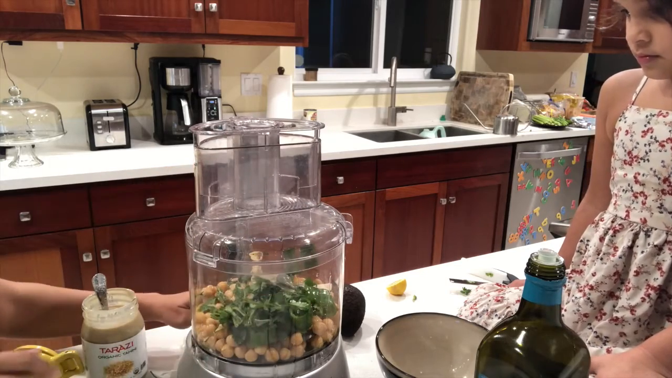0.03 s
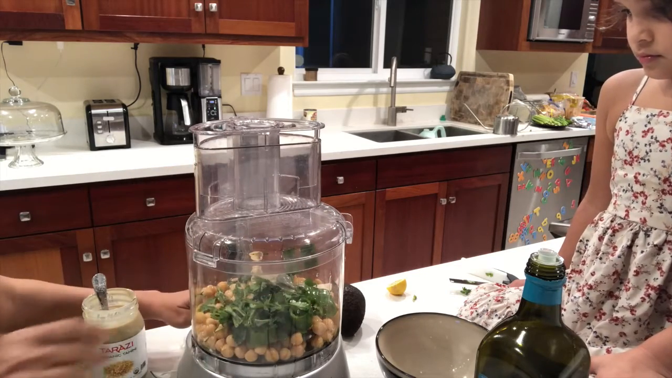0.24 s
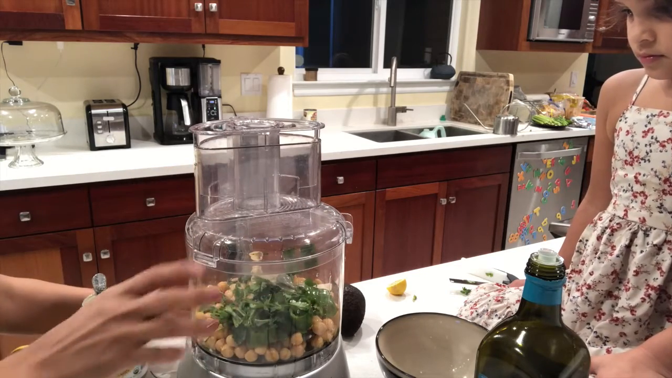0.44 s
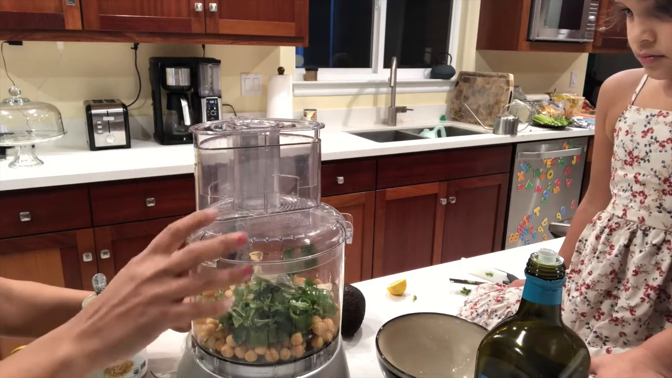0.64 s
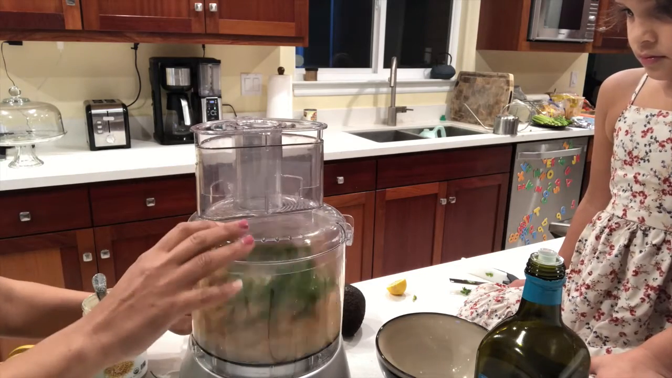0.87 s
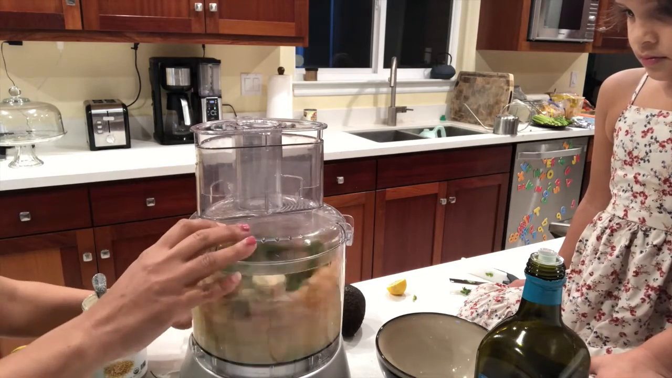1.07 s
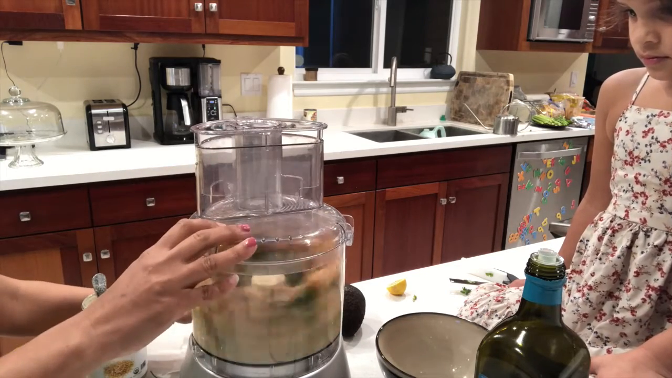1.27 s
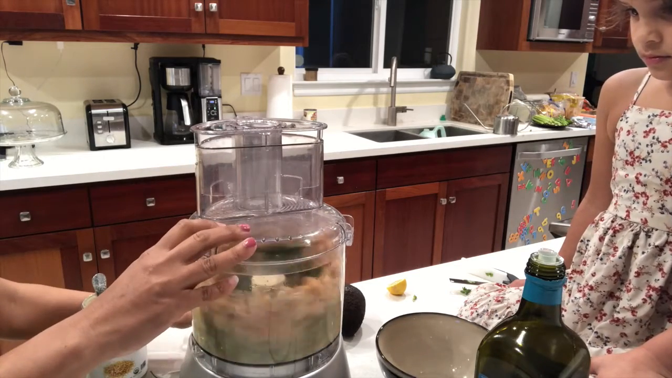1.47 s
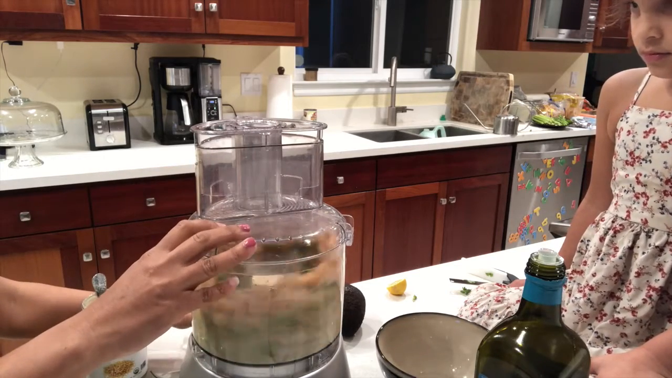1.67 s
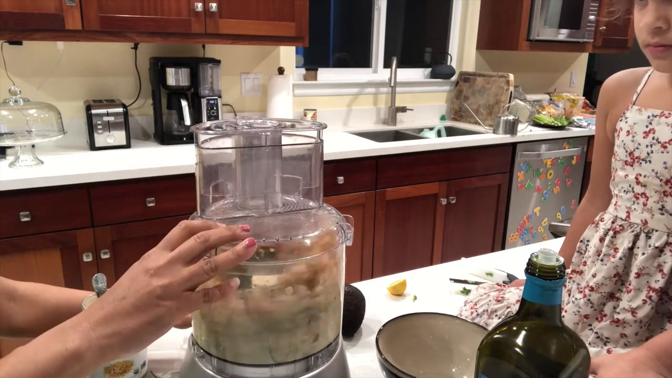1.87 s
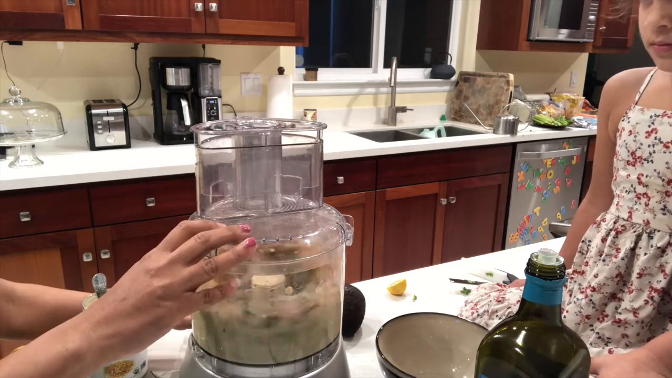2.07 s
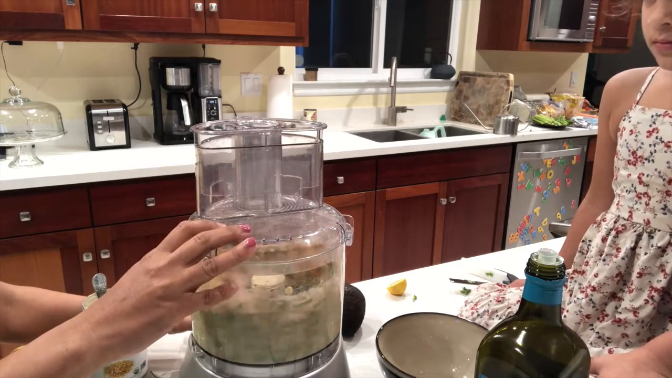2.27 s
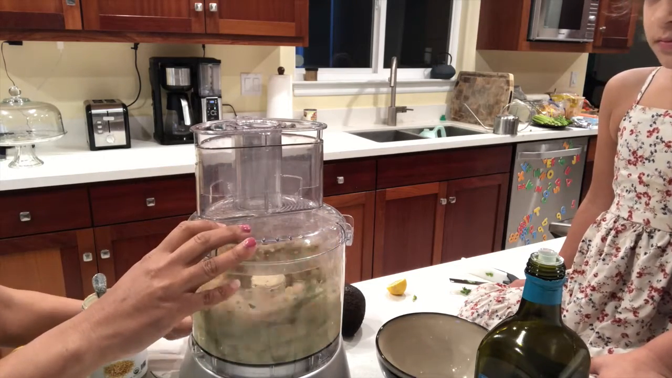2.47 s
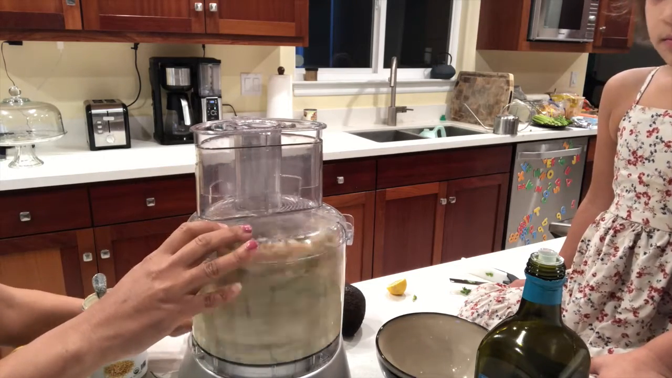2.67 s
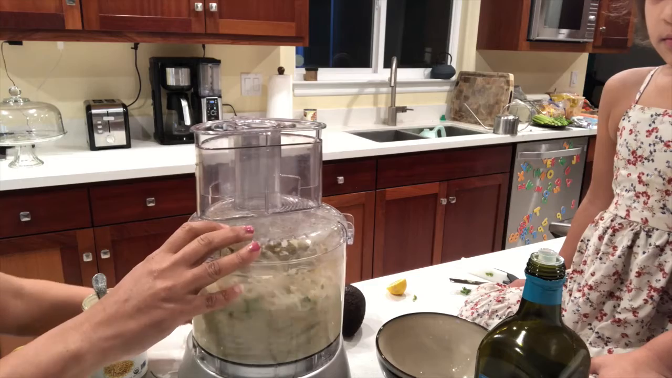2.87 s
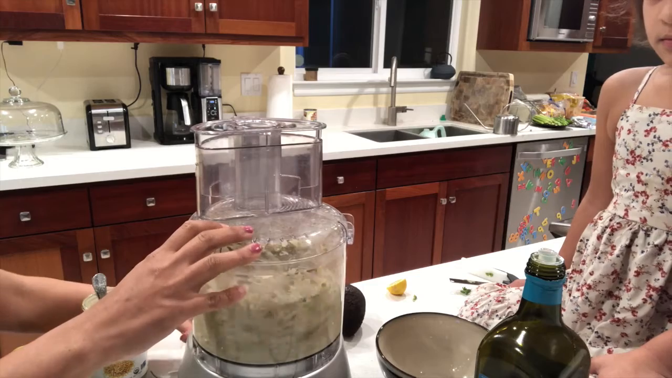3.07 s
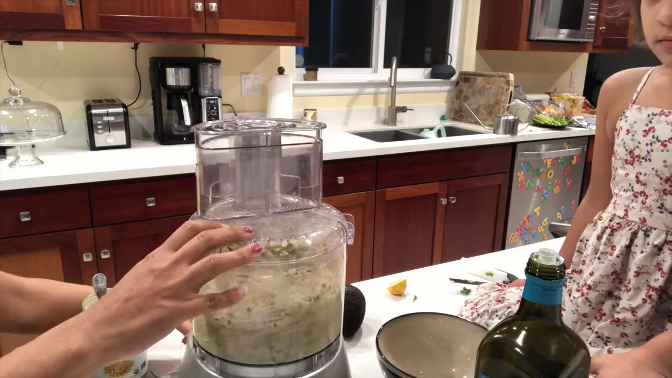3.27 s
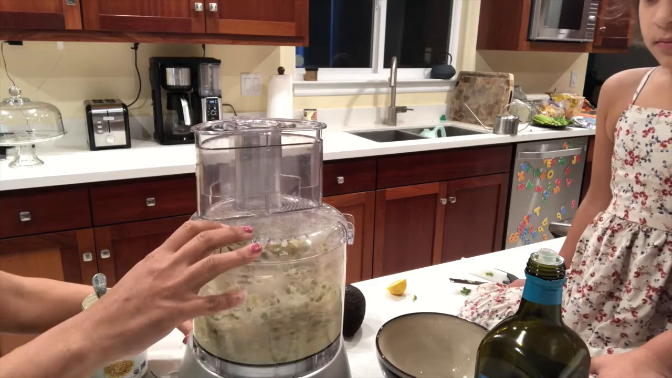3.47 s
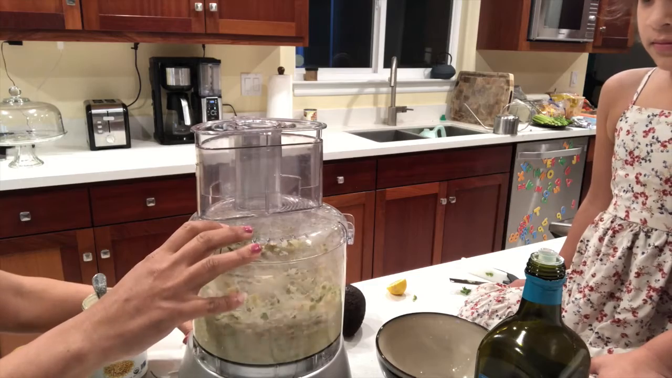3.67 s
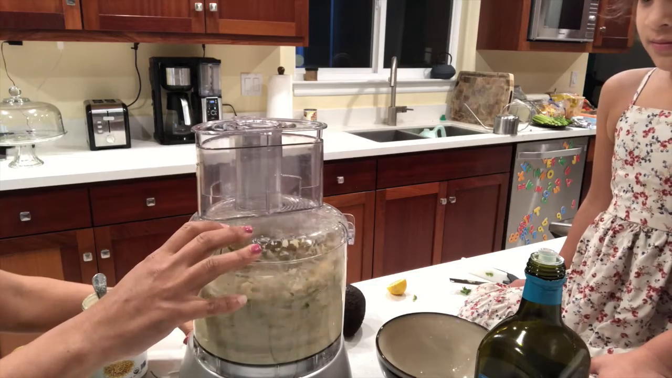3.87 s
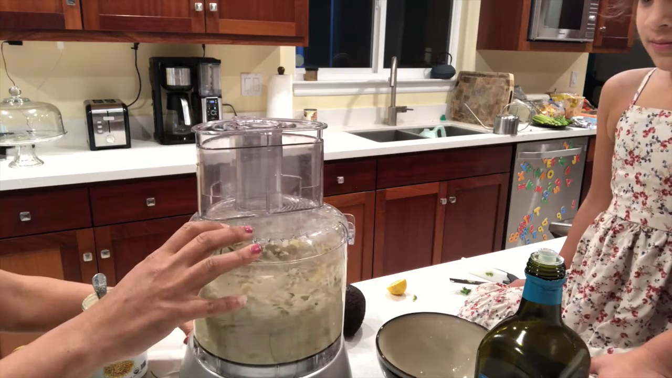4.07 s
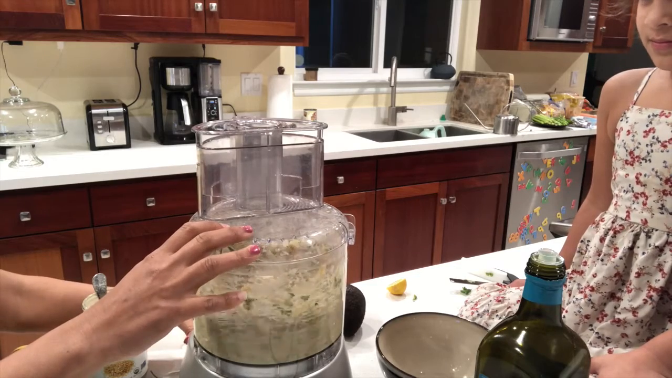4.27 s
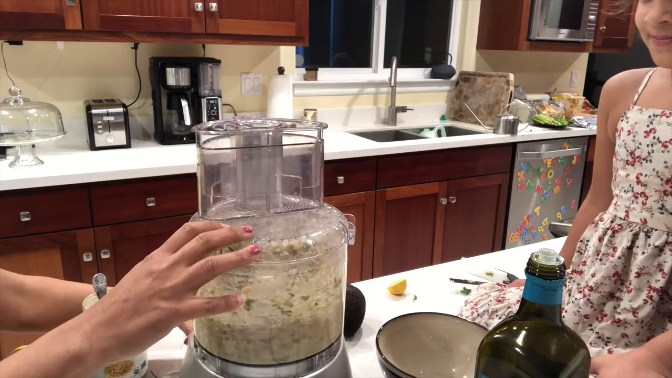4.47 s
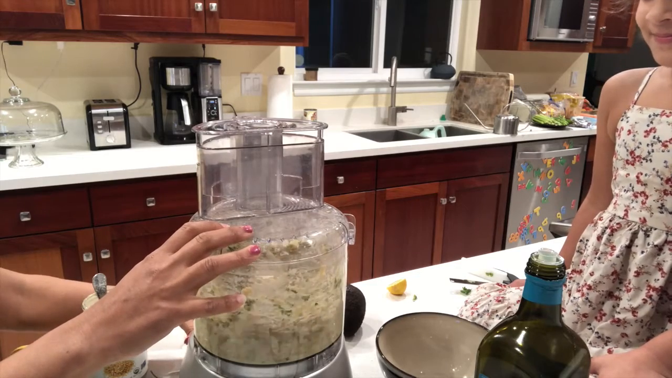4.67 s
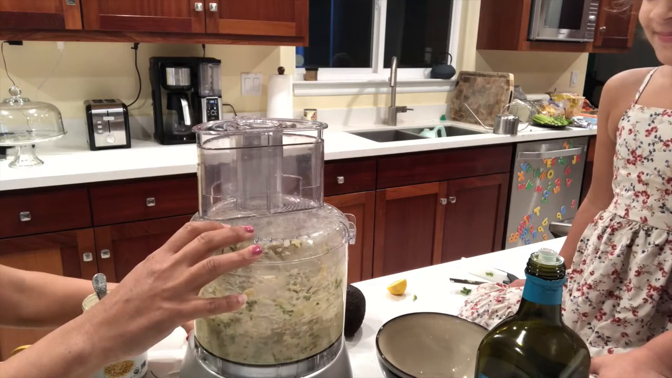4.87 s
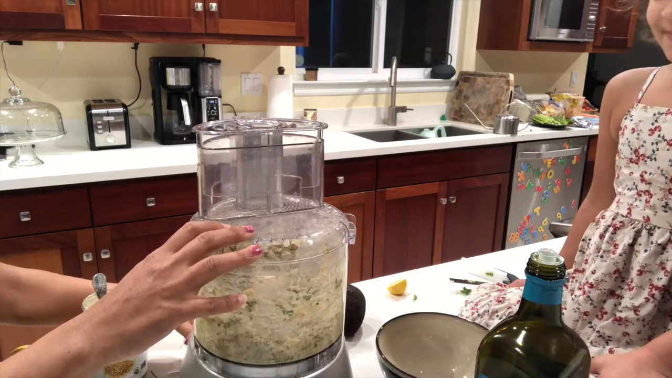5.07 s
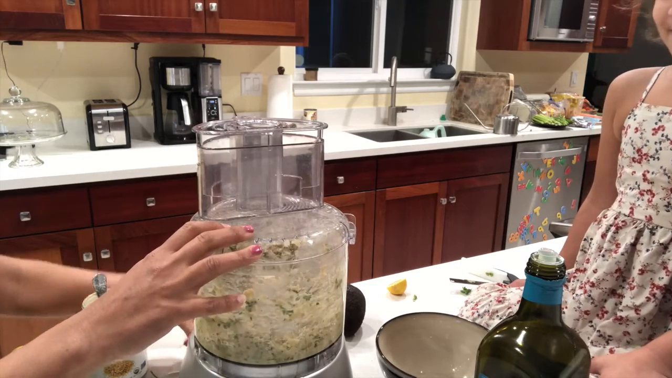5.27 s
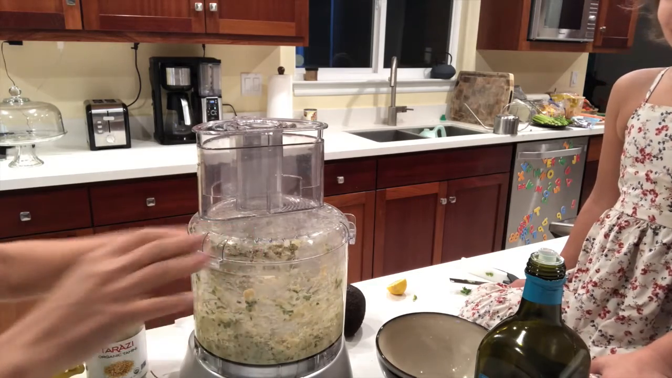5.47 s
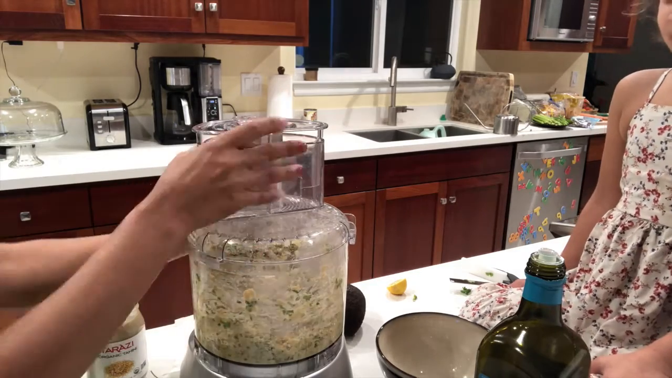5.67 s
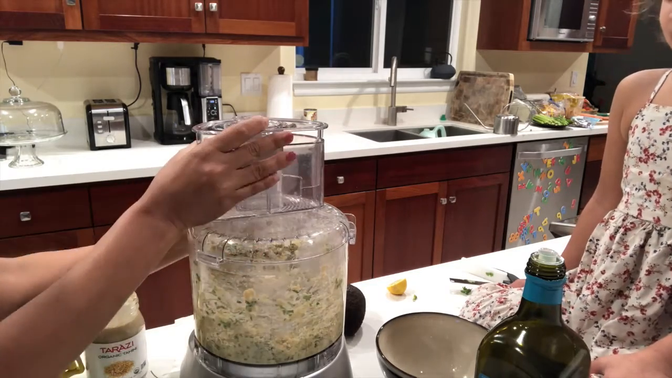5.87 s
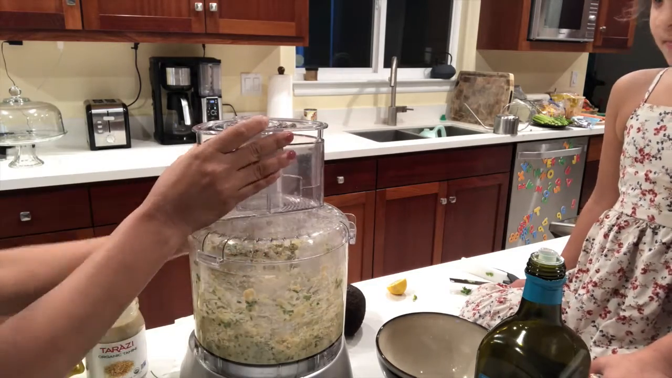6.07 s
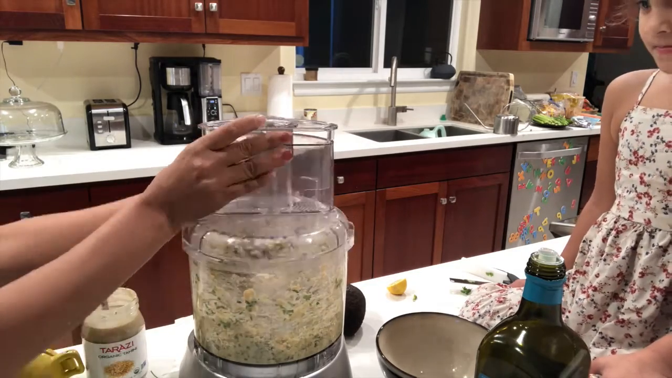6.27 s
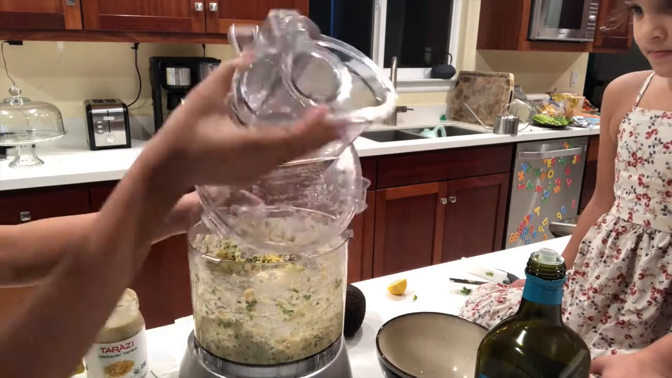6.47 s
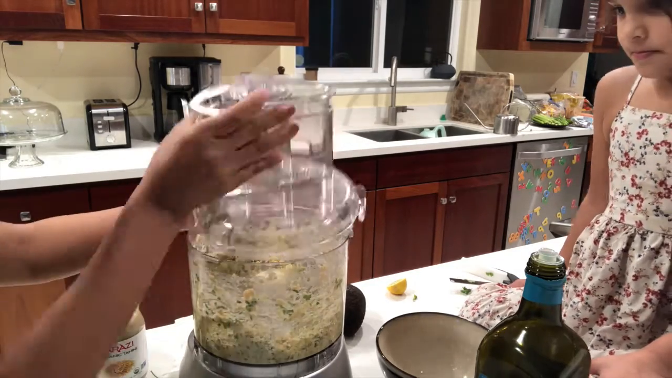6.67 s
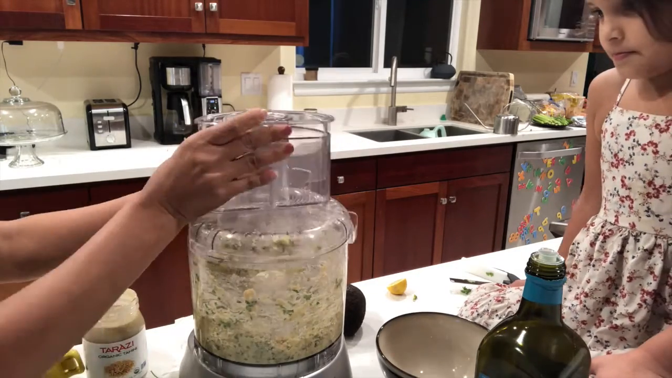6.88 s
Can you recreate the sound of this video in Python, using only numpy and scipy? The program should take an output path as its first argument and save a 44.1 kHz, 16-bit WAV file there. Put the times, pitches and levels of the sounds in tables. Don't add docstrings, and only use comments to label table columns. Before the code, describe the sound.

A food processor clicks on in a kitchen, roaring and grinding chickpeas and herbs against its plastic bowl, then stops; the lid quietly rattles.

```python
import sys
import numpy as np
from scipy import signal
from scipy.fft import rfft, irfft, next_fast_len
from scipy.io import wavfile
from scipy.ndimage import uniform_filter1d, map_coordinates

SR = 44100
rng = np.random.default_rng(int(sys.argv[2]) if len(sys.argv) > 2 else 0)


def file_out(sig):
    cols = np.atleast_2d(sig).T
    lim = np.clip(cols, -1, 1)
    pcm = np.round(lim * 32767).astype(np.int16)
    wavfile.write(sys.argv[1], SR, pcm)


def elevation(decibels):
    levels = np.asarray(decibels, float)
    return 10 ** (levels / 20)


N = 305172
T = np.arange(N) / SR
OFF_S = 4.874
USUAL_DB = -32


def unit(x):
    return x / np.sqrt(np.mean(x ** 2) + 1e-20)


def along(points, hz):
    f, v = np.transpose(points)
    return np.interp(np.log(hz + 1), np.log(f + 1), v)


def over_time(rows):
    s, value = np.transpose(rows)
    return np.interp(T, s, value)


def ramp(start_s, length_s):
    return np.clip((T - start_s) / length_s, 0, 1)


def wobble(rate):
    return map_coordinates(rng.standard_normal(int(N * rate / SR) + 4), [T * rate])


def filtered(x, response):
    size = next_fast_len(N + 8192)
    return irfft(rfft(x, size) * response(np.fft.rfftfreq(size, 1 / SR)), size)[:N]


def bass_cut(x):
    return signal.sosfilt(signal.butter(N=4, Wn=230, btype="high", fs=SR, output="sos"), x)


def mode(f, hz, width):
    return 1j * f * width / (hz * hz - f * f + 1j * f * width)


def noise(spectrum, patchy_db=0):
    z = signal.stft(rng.standard_normal(N), nperseg=512)[2]
    field = uniform_filter1d(rng.standard_normal(z.shape), 6, 0)
    field = uniform_filter1d(field, 8, 1)
    white = signal.istft(z * elevation(patchy_db * unit(field)), nperseg=512)[1][:N]
    return filtered(white, lambda f: elevation(along(spectrum, f)))


def pellets(rate, spread_db):
    hit = rng.random(N) < rate / SR
    sign = rng.standard_normal(N)
    size = np.minimum(rng.exponential(size=N), 4)
    return unit(hit * sign * elevation(spread_db * size))


# (time [s], level [dB])
LOAD = [(.796, -45), (.81, -44), (.83, -31.5), (.93, -30.5), (.975, -39.5), (1.0, -31.5), (1.31, -31),
        (1.5, -37), (1.6, -32), (1.75, -37), (1.87, -36.5), (2.05, -33), (2.55, -31.5), (2.95, -33.5),
        (3.1, -33.5), (3.7, -32.5), (4.03, -34.5), (4.875, -33.5)]
# (start [s], end [s],
# extra at start [dB], extra at end [dB], share reaching the spray [ratio])
JAMS = [
    (0.836, 0.907, 3.5, 6.5, 0.17),
    (2.571, 2.703, 7.5, 6.6, 0.87),
    (2.715, 2.76, 1.5, 1.5, 1.6),
    (2.765, 2.8, 3, 5.9, 0.97),
    (2.81, 2.842, 6.5, 6, 0.97),
    (2.855, 2.915, 2.5, 4.5, 0.66),
    (3.724, 3.824, 7.5, 7.6, 1.04),
    (3.837, 3.929, 7, 4, 1.1),
    (3.937, 3.988, 8, 7.3, 1.1),
]
# (time [s], extra level [dB], rise [s], fall [s])
JOLTS = [
    (1.36, 6.5, 0.13, .05),
    (2.64, 22, 0.063, 0.37),
    (2.89, 14, 0.043, 0.18),
    (3.76, 10, .04, .25),
    (4.15, 11, .08, 0.094),
    (4.75, 3, 0.11, .15),
]
# (sudden drop [dB], drop time [s], steady fall [dB/s])
COAST = [
    (-3, 0.057, 47),
    (-0.5, 0.11, 110),
    (6.5, 0.0066, 74),
    (2.5, 0.02, 80.5),
]


def effort():
    load_db = over_time(LOAD) - USUAL_DB
    ragged = 1 + 0.35 * wobble(30) / 6
    jam_db, fling_db = 0, 0
    for start, end, first_db, last_db, share in JAMS:
        hold = ramp(start, 0.007) * (1 - ramp(end, 0.022))
        hold = hold * np.interp(T, [start, end], [first_db, last_db]) * ragged
        jam_db = jam_db + hold
        fling_db = fling_db + share * hold
    jolt_db = sum(db * (ramp(s - rise, rise) - ramp(s, fall)) for s, db, rise, fall in JOLTS)
    thrum_db = -60 + jolt_db + 1.5 * wobble(6.7)
    drone_db = -31.5 + load_db + 0.34 * jam_db + 0.6 * wobble(8.8)
    bowl_db = USUAL_DB + load_db + jam_db
    spray_db = -41.5 + 0.55 * load_db + fling_db + 0.85 * wobble(13)
    running = [thrum_db, drone_db, bowl_db, spray_db]
    return [db - drop_db * ramp(OFF_S, over_s) - fall_db * np.maximum(T - OFF_S, 0)
            for db, (drop_db, over_s, fall_db) in zip(running, COAST)]


# (time [s], level [dB])
HUM = [(.85, -47), (1.1, -43), (1.5, -42), (1.75, -43), (2.45, -37), (2.6, -39), (2.95, -46.5), (3.1, -38),
       (3.56, -36), (4.0, -41), (4.4, -36.5), (4.9, -38)]
# (multiple [count], level [dB])
SHAFT = [(2, -31), (4, -15), (6, -2), (7, -15), (8, -23.5), (9, -13.5), (10, -6)]


def motor(turns):
    hum_db = over_time(HUM) + 0.6 * wobble(6)
    lines = elevation(hum_db) * np.sin(2 * np.pi * 5 * turns)
    for order, db in SHAFT:
        level = elevation(-40.5 + db + 3.4 * wobble(11))
        lines = lines + level * np.sin(2 * np.pi * order * turns + 1.9 * wobble(12))
    return np.sqrt(2) * lines * ramp(0.83, 0.016) * (1 - ramp(4.88, 0.05))


# (frequency [Hz], width [Hz], level [dB])
BOWL = [(710, 140, -3.5), (1070, 37, 5), (1249, 17, 6), (2118, 75, 1), (2818, 80, -3.5), (3640, 170, -14.5),
        (4940, 980, -21.5), (6166, 110, -22.5), (7280, 330, -25.5)]
# (frequency [Hz], level [dB per Hz])
PASTE = [(310, -36.5), (520, -16), (766, 4.5), (1710, -7.5), (2120, -1), (2410, -6.5), (2780, -10.5),
         (8760, -31.5), (15100, -30), (16000, -39)]
# (frequency [Hz], level [dB per Hz])
GRIND = [(310, -39.5), (520, -6.5), (1140, 0.5), (1260, 0.5), (1420, -5), (2120, -5.5), (2410, -10),
         (3710, -16), (8510, -29), (15100, -35.5), (16000, -35.5)]


def churn(turns, bowl_db, spray_db):
    beat = 0.3 * np.sin(2 * np.pi * turns + 1.3 * wobble(9))
    sweep = elevation(beat + 0.5 * wobble(24) + 0.8 * wobble(110))
    pelt = pellets(1600, spread_db=2.0) + 0.5 * rng.standard_normal(N)
    blades = 3.0 * np.sin(4 * np.pi * turns - 0.63 + 0.43 * wobble(8.4))
    rings = np.zeros(N)
    for hz, width, db in BOWL:
        flutter_db = 1.7 * wobble(20) + 1.6 * wobble(85) + blades * hz / (hz + 900)
        rings += elevation(db + flutter_db) * filtered(pelt, lambda f: mode(f, hz, 1.73 * width) ** 2)
    settled = 0.41 + 0.61 * ramp(0.95, 0.026) - 0.42 * ramp(OFF_S, 0.046)
    calm = unit(settled * unit(rings) + 1.3 * unit(noise(PASTE, patchy_db=0.5)))
    strokes = filtered(pellets(3500, spread_db=0.5), lambda f: elevation(along(GRIND, f)))
    scrape = unit(noise(GRIND, patchy_db=0.56)) * elevation(1.2 * wobble(300)) + 0.6 * unit(strokes)
    caught = np.clip((bowl_db + 31.5) / 3.9, 0, 1)
    wall = sweep * (np.sqrt(1 - caught) * calm + np.sqrt(caught) * unit(scrape))

    def below(f):
        return 1 / (1 + (f / 3400) ** 8)

    spray = unit(filtered(wall, lambda f: 1 - below(f)))
    top_hiss = filtered(spray, lambda f: 1 / (1 + (8000 / (f + 1)) ** 8))
    spray = spray - 0.55 * ramp(4.88, 0.04) * top_hiss
    return elevation(bowl_db) * unit(filtered(wall, below)) + elevation(spray_db) * spray


# (frequency [Hz], level [dB per Hz])
THRUM = [(20, -23.5), (35, -24), (46, -10), (60, 5), (75, -2), (95, -12), (115, -11), (140, -38.5),
         (240, -120)]
# (frequency [Hz], level [dB per Hz])
DRONE = [(59, -47.5), (100, -33.5), (134, -9.5), (156, -4), (226, 1), (265, -3.5), (360, -2.5),
         (540, -14.5), (600, -15), (780, -42), (1320, -120)]


def processor():
    thrum_db, drone_db, bowl_db, spray_db = effort()
    turns = 148.85 / 5 * T
    thrum = elevation(thrum_db + 1.2 * wobble(15)) * unit(noise(THRUM))
    drone = elevation(drone_db + 0.44 * wobble(22)) * unit(noise(DRONE, patchy_db=0.5))
    on = ramp(0.794, 0.0022) * (1 - ramp(5.35, 0.1))
    return on * (thrum + drone + churn(turns, bowl_db, spray_db)) + motor(turns)


def knocks(events, snap, sharp, burr, broad, strike, crisp):
    out, t = np.zeros(N + SR), np.arange(4096) / SR
    size = 8192
    f = np.fft.rfftfreq(size, 1 / SR)
    for s, db, hz, bright_db, t60 in events:
        chance = rng.standard_normal((2, len(t)))
        burst = (chance[0] + strike * (t == 0)) * elevation(-60 * t / (burr * t60))
        plastic = mode(f, hz, 1.8 * hz / sharp) ** 2 + broad * mode(f, hz, hz) ** 2
        ring = irfft(rfft(burst, size) * plastic, size)[:len(t)]
        dull_hz = 9000 * elevation(3.3 * (bright_db + 21))
        colour = elevation(along(snap, f)) / (1 + (f / dull_hz) ** 3)
        hiss = unit(irfft(rfft(chance[1], size) * colour, size)[:len(t)])
        fade = elevation(-60 * t / (crisp * t60)) + elevation(-11.5 - 60 * t / (1.4 * t60))
        body = ring / np.abs(ring).max() + elevation(bright_db + 4.0) * hiss * fade
        out[round(s * SR):][:len(t)] += elevation(db) * body * (1 - np.exp(-t / 0.0003))
    return out[:N]


# (time [s], peak level [dB], ring [Hz], brightness [dB])
CRACKS = [(1.098, -26.5, 2093, -13), (1.296, -20, 1099, -22), (1.372, -10, 1696, -8),
          (1.376, -12.5, 1390, -13.5), (1.547, -19, 1495, -7), (1.604, -19.5, 1206, -12),
          (1.416, -22, 1267, -12), (1.491, -18.5, 1210, -18), (1.552, -13.5, 1900, -5),
          (1.613, -14.5, 1077, -17.5), (1.671, -19.5, 1060, -25), (1.715, -18, 1066, -31.5),
          (1.817, -9.5, 1240, -18.5), (2.567, -11, 1294, -17.5), (2.59, -17, 1155, -15.5),
          (2.641, -17, 1230, -16.5), (2.689, -16.5, 1880, -7.5), (2.795, -22.5, 1125, -18.5),
          (3.013, -14.5, 1328, -13), (3.053, -17.5, 1070, -16.5), (3.73, -18, 1496, -10),
          (3.748, -16.5, 1300, -4.5), (3.802, -19, 1286, -10), (3.833, -19.5, 1645, -13),
          (3.878, -15, 1730, -16.5), (3.913, -13, 1260, -11.5), (3.952, -13, 1947, -14),
          (3.977, -9.5, 2063, -18.5), (5.362, -43.5, 1685, -16)]
# (time [s], peak level [dB], ring [Hz], brightness [dB], time to fall 60 dB [s])
CLICKS = [(0.766, -58, 1070, 2.5, 0.039), (0.802, -35.5, 1960, 1, 0.026), (1.05, -20.5, 2210, -20, 0.039),
          (1.336, -15.5, 2780, -22.5, 0.031), (2.872, -18, 2180, -16, .016), (2.964, -16, 2137, -18, 0.02),
          (4.869, -27, 804, -16, 0.013), (4.904, -21.5, 2100, -22, 0.065), (4.924, -35, 840, -23, 0.022),
          (4.954, -25.5, 2160, -36, 0.022), (5.391, -56.5, 916, -6.5, 0.048)]
# (frequency [Hz], level [dB per Hz])
WALL_SNAP = [(410, -38.5), (700, -8.5), (1280, -10), (2080, 5), (2370, -6), (3740, -7.5), (5690, -14),
             (10300, -21.5), (16000, -28)]


def wall_knocks():
    cracks = [(*row, 54 / row[2]) for row in CRACKS]
    cracked = knocks(cracks, WALL_SNAP, sharp=4.4, burr=0.94, broad=0.36, strike=9, crisp=0.83)
    clicked = knocks(CLICKS, WALL_SNAP, sharp=13, burr=0.26, broad=0.24, strike=6, crisp=0.67)
    return cracked + clicked


def paired_rings(events, gain_db, t60):
    out, t = np.zeros(N + SR), np.arange(SR // 20) / SR
    for s, db, hz in events:
        split, phase = rng.random(2)
        near_hz = hz * (0.96 + 0.068 * split)
        pair = np.sin(2 * np.pi * hz * t) + 0.71 * np.sin(2 * np.pi * (near_hz * t + phase))
        out[round(s * SR):][:len(t)] += elevation(db + gain_db - 60 * t / t60) * pair * (1 - np.exp(-t / 0.0012))
    return out[:N]


# (time [s], peak level [dB], ring [Hz])
PINGS = [(0.9892, -30, 2110), (1.0066, -36, 2140), (1.0231, -22.5, 2090), (1.2775, -29, 2130),
         (1.3179, -26, 2180), (1.5958, -27, 2220), (2.0133, -28, 2100), (2.0403, -20.5, 2220),
         (2.0961, -21, 2150), (2.1715, -34, 2120), (2.1969, -31, 2110), (2.3211, -30, 2160),
         (2.5396, -19, 2110), (2.816, -24, 2150), (2.9143, -25, 2046), (2.9417, -27, 2100),
         (3.054, -19.5, 2105), (3.2156, -24, 2130), (3.3922, -28, 2120), (3.489, -27, 2130),
         (3.6137, -28, 2070), (3.6416, -26, 2170), (3.676, -25, 2130), (3.7274, -20, 2250),
         (3.7853, -15, 2060), (3.8651, -24, 2040), (4.0432, -20, 2200), (4.2652, -27, 2180),
         (4.2951, -33, 2090), (4.3335, -30, 2160), (4.3495, -22, 2065), (4.4503, -23.5, 2100),
         (4.5057, -30, 2050), (4.5396, -24, 2160), (4.6234, -28, 2100), (4.6778, -29, 2240),
         (4.7237, -31, 2120), (4.7411, -25, 2190), (4.7925, -26, 2150), (4.8244, -27, 2150),
         (4.8414, -22, 2120)]
# (time [s], peak level [dB], ring [Hz])
TAPS = [(0.9983, -32, 1070), (1.0702, -30, 1050), (1.154, -22, 1040), (1.253, -20, 1260),
        (1.2934, -13.5, 1070), (1.3737, -16, 1250), (1.4169, -24, 1260), (1.4905, -17, 1237),
        (1.55, -12.5, 1050), (1.593, -19, 1234), (1.6708, -17.5, 1060), (1.7149, -16, 1050),
        (1.816, -18, 1260), (1.8748, -26, 1210), (1.9457, -21, 1046), (2.007, -20, 1240),
        (2.1547, -23, 1070), (2.1874, -18, 1020), (2.3496, -16.5, 1050), (2.4865, -23, 1037),
        (2.5309, -23, 1070), (2.5692, -9, 1070), (2.6544, -23, 1090), (2.6895, -26, 1220),
        (2.732, -22, 1100), (2.7676, -21, 1040), (2.8108, -11, 1240), (2.9639, -18.5, 1254),
        (3.0137, -11, 1180), (3.0542, -20, 1070), (3.1262, -23, 1044), (3.2028, -26, 1230),
        (3.4627, -30, 1230), (3.6318, -30, 940), (3.706, -18, 1090), (3.8319, -29, 1270),
        (3.9105, -14, 1260), (3.9524, -25, 1250), (4.0419, -23, 1190), (4.1261, -19, 1090),
        (4.1621, -17.5, 1070), (4.5714, -33, 1070), (4.63, -20, 1010), (4.7718, -23, 1010),
        (4.8197, -27, 985)]


def seeds_and_lumps():
    return paired_rings(PINGS, gain_db=-0.5, t60=0.035) + paired_rings(TAPS, gain_db=-4.5, t60=0.044)


# (time [s], peak level [dB], frequency [Hz])
SLAPS = [
    (1.372, -17, 650),
    (1.552, -17.5, 600),
    (1.818, -19.5, 750),
    (2.641, -15, 400),
    (2.797, -14, 450),
    (3.739, -19, 350),
    (3.981, -19, 380),
]


def slaps():
    return bass_cut(sum(elevation(db) * np.sin(2 * np.pi * ramp(s, 1 / hz)) for s, db, hz in SLAPS))


# (time [s], peak level [dB], ring [Hz], time to fall 60 dB [s])
THUMPS = [(0.735, -36, 178, 0.084), (0.806, -21.5, 196.6, 0.19), (0.86, -11, 206, 0.13),
          (1.086, -20, 224, 0.12), (1.29, -19, 301, 0.11), (1.613, -5.5, 228, 0.051),
          (2.148, -14.5, 218, 0.089), (2.636, -11, 220, 0.12), (2.867, -20, 216.6, 0.22),
          (3.76, -8.5, 307, 0.059), (3.969, -17.5, 212, 0.22), (5.37, -42.5, 183, 0.096),
          (6.291, -56, 277.7, 0.076), (6.779, -69, 261, 0.12), (6.823, -46.5, 280, 0.043),
          (6.852, -48, 253, 0.062)]


def thumps():
    out, t = np.zeros(N + SR), np.arange(SR // 4) / SR
    for s, db, hz, t60 in THUMPS:
        ring = elevation(db - 60 * t / t60) * np.sin(2 * np.pi * hz * t)
        out[round(s * SR):][:len(t)] += ring * (1 - np.exp(-t / 0.0066))
    return out[:N]


# (time [s], peak level [dB], ring [Hz], brightness [dB])
LID = [(5.786, -73, 825, -2), (5.819, -55, 3100, -12), (5.823, -49.5, 720, -21), (5.849, -67.5, 710, -5),
       (5.936, -67.5, 970, -11), (5.952, -70, 905, -8), (5.974, -63, 848, -2), (5.987, -56.5, 963, -3),
       (5.999, -59, 970, -10), (6.024, -62.5, 655, -10), (6.029, -59, 678, -5), (6.113, -57, 1090, -6),
       (6.128, -63, 1180, -8), (6.15, -51, 711, -14), (6.193, -59.5, 714, -14.5), (6.207, -59, 1034, -13),
       (6.225, -63, 775, -6.5), (6.255, -62, 880, -3), (6.288, -35, 940, -6.5), (6.356, -47, 1076, -17),
       (6.39, -67, 812, -9), (6.419, -54.5, 1004, -8.5), (6.427, -52, 948, -20), (6.428, -51, 3070, -23),
       (6.459, -61, 1090, -9), (6.476, -56, 956, -8), (6.481, -52.5, 1090, -8), (6.578, -64.5, 1010, -3),
       (6.612, -54, 1080, -6.5), (6.626, -60.5, 1070, -22)]
# (time [s], peak level [dB], ring [Hz], brightness [dB], time to fall 60 dB [s])
SEAT = [(6.2764, -61.5, 900, -5, 0.015), (6.2895, -36.5, 736, -12, 0.05), (6.35, -59.5, 900, -1, .02),
        (6.771, -46, 2280, -12, 0.011), (6.773, -53, 1100, -24, 0.051), (6.795, -60.5, 1100, -14, 0.06),
        (6.8152, -43, 2880, -21, 0.011), (6.82, -46.5, 1400, -7.5, 0.0464), (6.825, -48, 2920, -22, .015),
        (6.84, -53.5, 1100, -26, 0.04), (6.8473, -43.5, 1100, -8.5, 0.025), (6.857, -55, 890, -16, 0.056)]
# (time [s], peak level [dB], ring [Hz], brightness [dB], time to fall 60 dB [s])
TICKS = [(5.708, -75.5, 8000, -6, .008), (5.788, -64, 7500, -8, .012), (5.884, -72, 9000, -3, .01),
         (5.922, -72, 12050, -4, .008), (5.933, -70, 9000, -3, .01), (5.954, -69, 10000, -3, .01),
         (6.005, -66, 2500, -2, .012), (6.079, -76, 3980, -4, .01), (6.119, -56.5, 2410, -2, .014),
         (6.398, -68, 2800, -6, .012), (6.412, -65, 1050, -8, .02), (6.433, -59, 2800, -14, .012),
         (6.437, -63, 2800, -10, .01), (6.8195, -48, 5300, -6.5, .012), (6.865, -62, 4200, -14, .02)]
# (frequency [Hz], level [dB per Hz])
LID_SNAP = [(900, -22), (1500, -3), (2200, -2), (3200, 0), (4500, -5), (7000, -8), (12000, -14),
            (16000, -21)]


def lid_contacts():
    handling = [(*row, 0.025) for row in LID]
    contacts = knocks(handling + SEAT + TICKS, LID_SNAP, sharp=7.9, burr=0.54, broad=0.146, strike=7.1, crisp=0.45)
    return bass_cut(contacts)


# (start [s], end [s], centre [Hz], width [Hz], level [dB])
RUBS = [(0.192, 0.196, 9000, 9000, -59.5), (.33, 0.34, 12000, 8000, -76), (.362, .37, 4200, 3000, -65),
        (0.547, 0.624, 3400, 3000, -69.5), (4.975, 5.001, 13650, 1500, -65),
        (5.03, 5.099, 13000, 5000, -69), (5.242, 5.352, 11700, 10200, -66), (5.388, 5.482, 7000, 1490, -69),
        (5.398, 5.469, 14600, 3030, -79), (5.713, 5.776, 5530, 3500, -78), (5.793, 5.83, 8640, 2490, -76),
        (5.836, 5.877, 10270, 2490, -72), (5.873, 5.939, 5960, 7930, -76), (5.718, 5.774, 3050, 705, -81),
        (5.83, 5.943, 3000, 900, -79)]


def rubs():
    out = np.zeros(N)
    f = np.fft.rfftfreq(8192, 1 / SR)
    for start, end, hz, width, db in RUBS:
        count = round((end - start) * SR)
        puff = unit(irfft(rfft(rng.standard_normal(8192)) * mode(f, hz, width) ** 2))
        swell = np.sin(np.pi * np.arange(count) / count)
        out[round(start * SR):][:count] += elevation(db) * puff[:count] * swell
    return out * elevation(2.2 * wobble(140))


# (frequency [Hz], time to fall 60 dB [s])
KITCHEN = [(200, 0.38), (2000, 0.51), (10000, 0.15)]


def room(x):
    hz, t, z = signal.stft(rng.standard_normal(SR // 2), SR, nperseg=256)
    fade = elevation(-60 * t / along(KITCHEN, hz)[:, None])
    tail = signal.istft(z * fade, SR, nperseg=256)[1]
    return signal.fftconvolve(np.pad(x, (200, 0)), tail / np.linalg.norm(tail))[:N]


# (frequency [Hz], level [dB per Hz])
AIR = [(15, -34), (50, -7.5), (120, -4), (200, -5.5), (326, -6), (695, -12), (911, -14.5), (1330, -18.5),
       (2350, -23), (3160, -23.5), (7310, -29.5), (16000, -43)]
# (frequency [Hz], level [dB per Hz])
THIN_AIR = [(59, -62.5), (100, -40), (224, -1.5), (415, -11), (691, -6), (1010, -5), (1280, -7),
            (1420, -11), (1870, -13), (6990, -24.5), (16000, -27.5)]


def air():
    before = elevation(-63 + 0.31 * wobble(1.6)) * unit(noise(AIR, patchy_db=1.5))
    after = elevation(-78 + 1.0 * wobble(25)) * unit(bass_cut(noise(THIN_AIR, patchy_db=3.5)))
    fridge_overtone = elevation(-83) * np.sin(2 * np.pi * 690 * T + 0.97 * wobble(5.5))
    fridge = elevation(-66 + 1.5 * wobble(6.5)) * np.sin(2 * np.pi * 172 * T + 0.4 * wobble(5.5))
    fridge = fridge + elevation(-74.5) * np.sin(2 * np.pi * 112 * T + 0.9 * wobble(7))
    return np.where(T < 5.624, before + fridge, after + fridge_overtone)


def scene():
    bowl = wall_knocks() + seeds_and_lumps() + slaps()
    lid = lid_contacts()
    echoes = elevation(-12) * room(bowl) + elevation(-21) * room(lid)
    mix = processor() + bowl + thumps() + lid + rubs() + echoes + air()
    return mix[None]


def top_cut(x):
    return signal.sosfilt(signal.butter(12, 16990, fs=SR, output="sos"), x)


def record(dry):
    limited = filtered(dry[0], lambda f: np.where(f < 15950, 1, elevation(-45)) / (1 + (40 / (f + 1)) ** 4))
    return top_cut(limited[None])


dry = scene()
out = record(dry)
file_out(out)
```